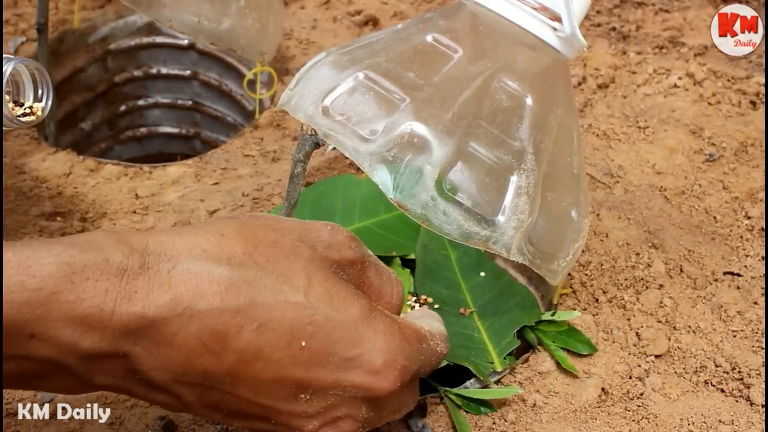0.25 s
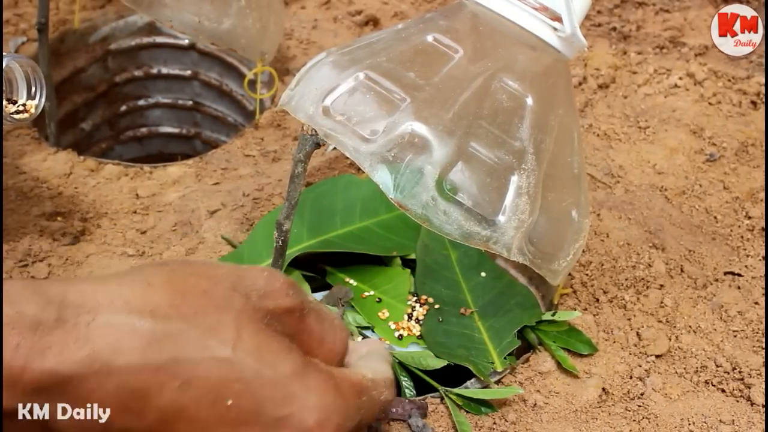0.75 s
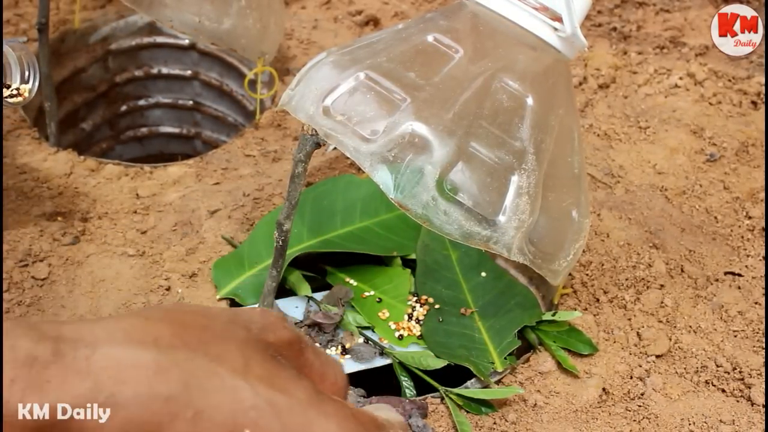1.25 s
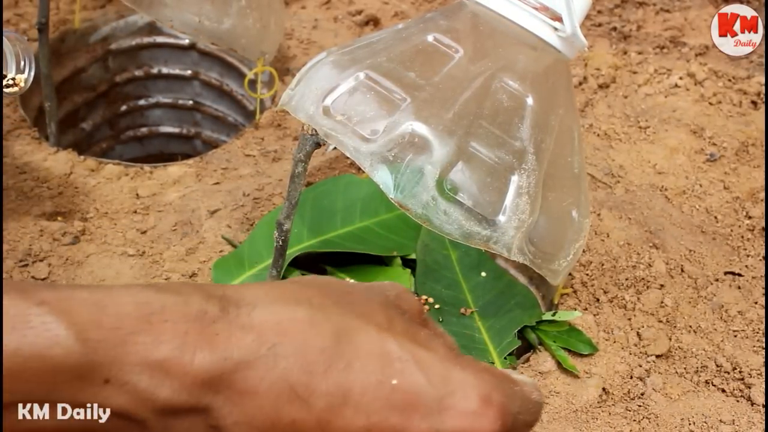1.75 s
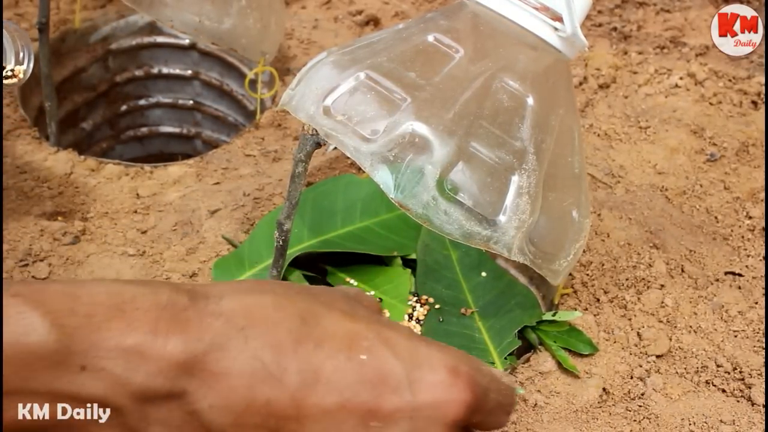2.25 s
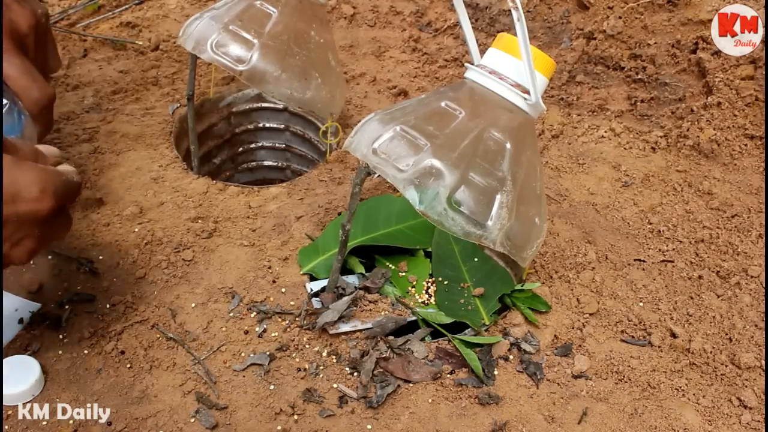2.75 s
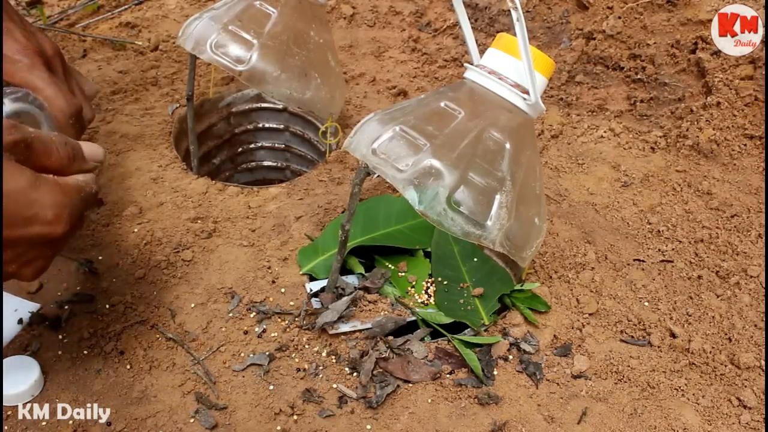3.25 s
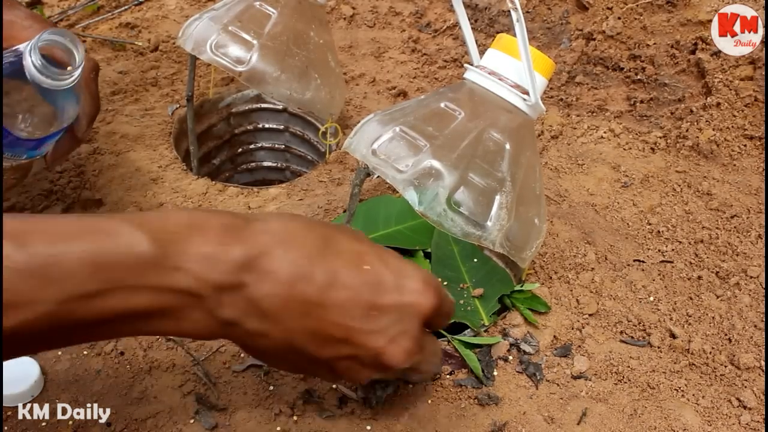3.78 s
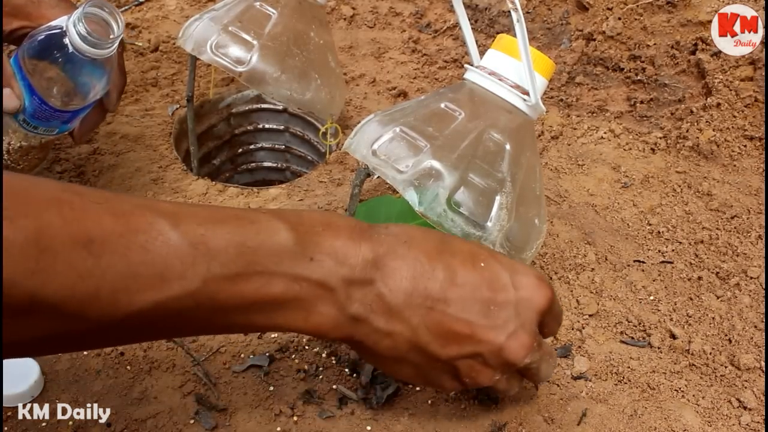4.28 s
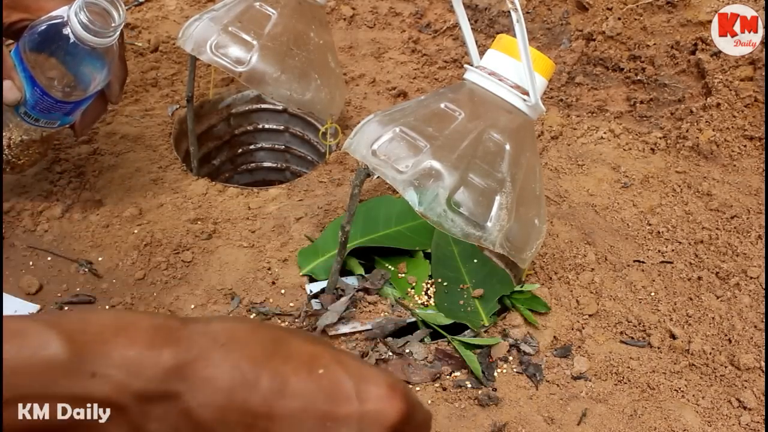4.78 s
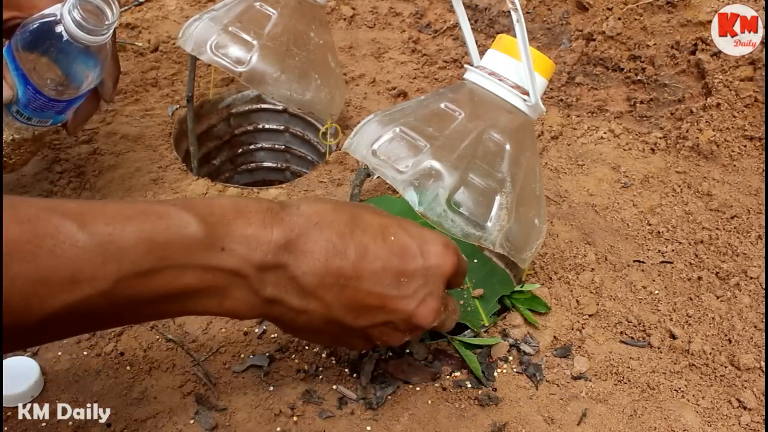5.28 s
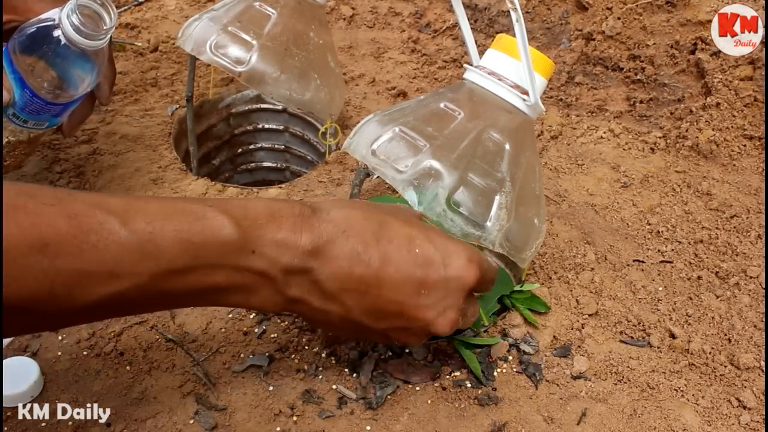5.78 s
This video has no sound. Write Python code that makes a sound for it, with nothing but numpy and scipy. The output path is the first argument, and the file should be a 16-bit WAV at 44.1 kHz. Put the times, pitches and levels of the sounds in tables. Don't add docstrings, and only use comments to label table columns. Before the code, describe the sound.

Close outdoor stereo pickup: fingers softly brush a leaf and a handful of seeds ticks down in dry crackles, over a low distant motor, a faint bird trill, insect buzz and far wooden thuds. A tiny dead silence cuts the motor off. Seeds then rattle through three shakes of a plastic bottle with sharp wall pops and a wind bump, followed by another sparse handful on leaves.

```python
import sys
import numpy as np
from scipy import signal
from scipy.fft import rfft, irfft, next_fast_len
from scipy.io import wavfile
from scipy.ndimage import uniform_filter1d

SR = 44100
rng = np.random.default_rng(int(sys.argv[2]) if len(sys.argv) > 2 else 0)


def elevation(decibels):
    levels = np.asarray(decibels, float)
    return 10 ** (levels / 20)


def dump(signal):
    limited = np.clip(np.atleast_2d(signal).T, -1, 1)
    pcm = np.round(limited * 32767).astype(np.int16)
    wavfile.write(sys.argv[1], SR, pcm)


N = 265702

# frequency in Hz, level in dB per Hz.
AIR_SPECTRUM = [(15, -37), (25, -21), (84, -2), (126, -4), (174, -4.5), (361, -9.5), (541, -10),
                (1350, -17), (2590, -17.5), (7820, -27), (14200, -36.5), (15800, -46)]
# frequency in Hz, side minus mid in dB.
AIR_WIDTH = [(60, -13.5), (110, -7), (200, 0.5), (380, 2), (700, 4.5), (1290, 3), (2380, 4), (4400, 0),
             (8120, 1.5), (15000, -2.5)]
# peak time in seconds, peak level in dB, length in seconds.
WIND_PUFFS = [(2.4, -57, .2), (2.64, -49.5, 0.2), (3.003, -54, 0.12), (3.46, -55, .05), (3.56, -40.5, .05),
              (3.655, -30, 0.047), (3.777, -36.5, 0.067), (3.894, -38, 0.053), (4.008, -37, 0.023),
              (4.175, -45, 0.088), (4.4, -52, 0.057), (4.9, -70, .3), (5.127, -56, .15), (5.396, -58, 0.11),
              (5.594, -49.5, .15), (5.914, -60, 0.13)]
# time in seconds, level in dB.
MOTOR_LEVEL = [(0, -53), (.24, -49.5), (.38, -53), (.69, -49), (.81, -58.5), (1.0, -57), (1.17, -53),
               (2.11, -49.5), (2.2, -54)]
# time in seconds, level in dB.
LEAF_BRUSH = [(0.0, -53), (0.072, -54.5), (0.118, -65), (0.132, -53.5), (0.156, -68), (0.206, -71),
              (0.25, -61)]
# time in seconds, peak in
# dB, centre in Hz, body in dB.
LEAF_TOUCHES = [(0.0518, -36, 2970, 3), (0.1313, -22.5, 3740, -34), (.177, -47, 1810, -9),
                (0.2093, -42, 2700, 9), (0.279, -45.5, 4250, -12), (.3353, -43, 3880, -14),
                (0.3652, -35, 5400, -1.5), (0.382, -35, 4400, -26), (.423, -40, 4200, -3),
                (0.4549, -22, 2480, -5), (0.4996, -32.5, 4160, -10), (.5337, -42, 10500, -18.5),
                (0.589, -40, 9600, -12), (.6388, -41.5, 8300, -9), (.6624, -41, 9000, -14),
                (0.6887, -35, 8500, -18), (0.72, -40.5, 7400, -5), (0.744, -42, 9000, 2),
                (0.7783, -39, 4200, -11), (.816, -31.5, 7560, -32), (.9084, -43, 4123, -6),
                (0.9785, -30, 2900, -36), (0.9933, -36, 5790, 2), (1.0405, -43, 2080, -10),
                (1.102, -31.5, 4170, -34), (1.149, -32.5, 3600, -39), (1.1865, -39, 2980, 1),
                (1.261, -33.5, 3560, -19), (1.5488, -46, 2750, -23),
                (3.8898, -39, 3830, -28), (3.9324, -48, 2150, 6.5), (3.9494, -55, 4580, -10),
                  (3.972, -35.5, 3060, -19), (4.2432, -43, 4490, 0), (4.329, -31.5, 2010, 3),
                  (4.3665, -41, 2150, -15), (4.3844, -51, 4520, 2), (4.401, -41, 4500, -24),
                  (4.422, -40.5, 4250, -27), (4.4664, -39, 4340, -17), (4.4997, -46, 2830, -12),
                  (4.517, -31.5, 4500, -4), (4.5255, -34, 4200, -11), (4.5357, -37, 4600, -8),
                  (4.5854, -45, 1914, -18), (5.1307, -37, 1760, 2), (5.1583, -39.5, 4000, 0),
                  (5.3333, -34, 3080, -31), (5.4023, -44, 2500, 2), (5.5879, -44, 7900, -20),
                  (5.647, -49, 2004, 5), (5.656, -40.5, 1150, -11), (5.798, -36.5, 5470, -4),
                  (5.8642, -41.5, 2090, 8), (5.884, -40, 5450, -3), (5.887, -43.5, 1050, -20),
                  (5.35, -47, 1800, -3)]
# time in seconds, peak in dB, centre in Hz, body in dB.
WALL_STRIKES = [(2.8832, -25, 2200, 5), (2.987, -45.5, 3810, -17), (3.02, -37.5, 3260, -8),
                (3.0954, -33.5, 2140, 3), (3.1538, -36, 3500, -24), (3.196, -36.5, 4280, -14),
                (3.2307, -37, 1670, 6.5), (3.276, -28, 4600, -9), (3.4, -23.5, 6180, 0),
                (3.4606, -25.5, 2150, -2), (3.612, -26, 4380, -12), (3.626, -29, 5090, -27)]
# time in seconds, peak in dB, decay time t60 in seconds.
FAR_BLOWS = [(0.181, -38.5, 0.5), (0.649, -41, 0.71), (2.03, -37, 0.34), (4.139, -44.5, 0.41),
             (5.229, -49, 0.38)]
# start in seconds, level in dB.
TRILL_NOTES = [(.285, -58), (.392, -57), (.515, -58), (.637, -57), (.758, -58), (.893, -57.5)]
# start in seconds, stop in seconds, start in Hz, end in Hz, level in dB.
FAR_HOOT = (1.13, 1.32, 640, 670, -66)
# start in seconds, stop in seconds, end level in dB.
INSECT_SWELLS = [
    (.4, .88, -65.5),
    (1.3, 1.91, -63),
]
# time in seconds, peak in dB.
LEAF_SAGS = [
    (.457, -44.5),
    (4.33, -42.5),
]
# start in seconds, stop in seconds.
PAUSE = (2.2045, 2.3025)
# time in seconds, level in dB.
BOTTLE_SHAKES = [
    [(2.3, -47.5), (2.306, -40), (2.318, -37.5), (2.408, -37.5), (2.46, -49), (2.542, -33.5), (2.67, -29.5),
     (2.698, -26.5), (2.784, -44.5)],
    [(2.786, -42.5), (2.836, -25.5), (2.874, -40), (2.886, -35.5), (2.894, -39), (3.086, -68.5),
     (3.096, -48), (3.112, -43.5), (3.186, -64)],
    [(3.188, -60), (3.292, -43), (3.344, -45), (3.43, -34.5), (3.504, -37.5), (3.606, -39.5), (3.63, -36),
     (3.652, -40), (3.76, -55)],
]
# frequency in Hz, level in dB per Hz.
SEED_SPECTRUM = [(180, -39), (300, -20), (759, -10.5), (881, -9), (2120, -3.5), (2550, -5), (3670, -0.5),
                 (8680, -4.5), (12700, -18.5), (15800, -35)]
# frequency in Hz, side minus mid in dB.
SEED_WIDTH = [(200, -6), (700, -12), (2400, -10), (8000, -7), (15000, -5)]
# frequency in Hz, width in Hz, boost in dB.
WALL_RESONANCES = [(2197, 57, 4), (3070, 220, 4), (3680, 1070, 3), (4600, 350, 3), (5450, 260, 4),
                   (6100, 660, 3.5)]
# time in seconds, mode in Hz,
# level against the slide in dB, half length in seconds.
CROWD_RINGS = [(3.45, 2150, -7, .03), (2.47, 2000, -7, .04), (2.705, 3750, -7, .035),
               (2.835, 3800, -6, .03), (3.63, 5100, -4, .02), (3.44, 6100, -8, .05)]
# time in seconds, peak in dB, then cavity, wall and rim mode levels in dB.
WALL_POPS = [
    (2.409, -40, -7, 4.5, 11),
    (2.496, -39.5, 2.5, -9, -2),
    (2.882, -18.5, -13, -10.5, -10),
    (3.0971, -25, -12, 0, 12),
    (3.229, -19, -9.5, -5, -20),
]
# frequency in Hz, decay time t60 in seconds.
POP_RING = [(225, 0.082), (520, 0.03), (820, 0.0091), (1300, 0.012), (2000, 0.0093)]
# start in seconds, length in seconds, start in Hz, end in Hz, level in dB.
WARBLE_NOTES = [(4.718, .016, 3400, 3200, -64), (4.745, .025, 3350, 3500, -66),
                (4.787, .022, 3150, 3250, -59), (4.815, .022, 2900, 2500, -64),
                (4.87, .03, 2300, 2200, -66), (5.235, .025, 2800, 2500, -66), (5.43, .025, 3400, 2500, -66),
                (5.505, .025, 3500, 3850, -65), (5.705, .045, 3150, 2450, -65)]

PORT_LAG_S = .000024
SEED_MEAN_DB, BOTTLE_PAN_DB = -41, 2.5


def in_time(rows, outside=None):
    s, *columns = np.transpose(rows)
    return [np.interp(np.arange(N) / SR, s, c, outside, outside) for c in columns]


def at_hz(points, hz):
    point_hz, point_db = np.array(points).T
    return np.interp(np.log(hz), np.log(point_hz + 1), point_db)


def rms_one(x):
    return x / np.sqrt(np.mean(x ** 2) + 1e-20)


def drift(rate):
    r = np.exp(-80 * np.pi * rate / SR)
    slow = signal.lfilter([1], [1, -2 * r, r * r], rng.standard_normal(N // 40 + 2002))[2000:]
    return np.interp(np.arange(N) / 40, np.arange(len(slow)), rms_one(slow))


def resonance(x, hz, width_hz):
    r = np.exp(-np.pi * width_hz / SR)
    poles = [1, -2 * r * np.cos(2 * np.pi * hz / SR), r * r]
    return signal.lfilter([(1 - r * r) / 2, 0, (r * r - 1) / 2], poles, x)


def band(x, low_hz, high_hz):
    return signal.sosfilt(signal.butter(2, [low_hz, min(high_hz, .45 * SR)], "band", fs=SR, output="sos"), x)


def pan(db):
    return elevation(np.array([db / 2, -db / 2]))


def lagged(x):
    size = next_fast_len(N)
    turn = np.exp(-2j * np.pi * np.fft.rfftfreq(size, 1 / SR) * PORT_LAG_S)
    right = irfft(rfft(x[1], size) * turn, size)[:N]
    return np.array([x[0], right])


def banks(white, spectrum, side_db, low_hz, patchy_db, tilt_db=0):
    out, edges = 0, 20 * 2 ** np.arange(0, 10.1, .5)
    for k, (low, high) in enumerate(zip(edges, edges[1:])):
        if low >= low_hz:
            mid, side = band(white[k % 2], low, high)
            hz = np.sqrt(low * high)
            lift = tilt_db * np.clip(np.log2(hz / 4500), 0, 1)
            share = elevation(at_hz(side_db, hz))
            gain = elevation(at_hz(spectrum, hz) + lift + patchy_db * drift(18)) / np.sqrt(1 + share ** 2)
            out = out + gain * (mid + share * side * [[1], [-1]])
    return out


def open_air():
    air = banks(rng.standard_normal((2, 2, N)), AIR_SPECTRUM, AIR_WIDTH, 20, patchy_db=1.55)
    loudness = np.sqrt(np.mean(band(air.mean(axis=0), 208, 12000) ** 2))
    fade_db = 0.38 * np.arange(N) / SR
    return air / loudness * elevation(-56.24 - fade_db)


def wind():
    eddies = band(band(rng.standard_normal((2, N)), 21, 120), 19, 126)
    mid, side = eddies / np.sqrt(uniform_filter1d(eddies ** 2, 2600) + 1e-6)
    t = np.arange(N) / SR
    calm_db, drop_db = -67.5, 21
    gust = elevation(calm_db) + sum(elevation(db - drop_db * ((t - s) / length) ** 2) for s, db, length in WIND_PUFFS)
    return gust * elevation(-2.5 + .8 * drift(13)) * (.45 * mid + side * np.array([[.8], [-1.2]]))


def motor():
    db, = in_time(MOTOR_LEVEL)
    phase = 2 * np.pi * 113.8 * np.arange(N) / SR + 0.42 * drift(5.3)
    lead = .9
    level = np.sqrt(2) * elevation(db + 1.0 + 0.6 * drift(22))
    return level * np.sin(phase + np.array([[lead / 2], [-lead / 2]]))


def leaf_brush():
    rub = rng.standard_normal((2, N)) + 0.49 * rng.standard_normal(N)
    return rms_one(resonance(rub, 2050, 700)) * elevation(in_time(LEAF_BRUSH, outside=-120)[0] - 3.0)


def seed_ticks():
    out, t = np.zeros((2, N + 2000)), np.arange(2000) / SR
    touches = [row + (0,) for row in LEAF_TOUCHES]
    touches += [row + (BOTTLE_PAN_DB,) for row in WALL_STRIKES]
    for s, db, hz, low_db, side_db in touches:
        grit = rng.standard_normal(2000) * elevation(2.2 * rng.standard_normal(2000))
        burst = grit * (np.exp(-t / 0.0042) + 0.33 * np.exp(-t / 0.0087))
        low_hz = max(min(2200, .8 * hz), .5 * hz)
        voice = band(burst, low_hz, max(10000, 1.4 * hz))
        voice = voice + 1.2 * resonance(resonance(burst, hz, .3 * hz), hz, .4 * hz)
        voice = voice / abs(voice).max()
        body = band(band(burst, 1500, 3300), 1100, 3800)
        edge = band(band(burst, 7500, 13000), 7000, 14000)
        edge_db = -17.5 - .7 * (db - SEED_MEAN_DB) + 4 * np.log2(hz / 4000)
        voice += elevation(low_db - 4.5) * body / abs(body).max()
        voice += elevation(edge_db) * edge / abs(edge).max()
        i = round((s + 0.00044) * SR)
        out[:, i:i + 2000] += elevation(db - 3.0) * np.outer(pan(side_db), voice)
    return lagged(out[:, :N])


def thuds():
    out, t = np.zeros((2, N)), np.arange(20000) / SR
    for s, db, t60 in FAR_BLOWS:
        echo = rng.standard_normal((2, 20000)) + .8 * rng.standard_normal(20000)
        echo = echo * (1 + 0.22 * np.cos(2 * np.pi * 32 * t) + 0.61 * np.exp(-t / 0.0014))
        body = resonance(resonance(echo, 555, 180), 520, 280) + 0.21 * resonance(echo, 980, 270)
        i = round((s - .001) * SR)
        out[:, i:i + 20000] += elevation(db - 8.5 - 60 * t / max(t60, .05)) * rms_one(body)
    return out


def bird():
    out, t = np.zeros(N), np.arange(round(.062 * SR)) / SR
    for s, db in TRILL_NOTES:
        hz = 4340 - 2400 * t - 22000 * t ** 2 + 25 * rng.standard_normal()
        swell = np.sin(np.pi * (t / t[-1]) ** 0.636)
        i = round(s * SR)
        out[i:i + len(t)] += elevation(db) * swell * np.sin(2 * np.pi * np.cumsum(hz) / SR)
    out = out * elevation(1.2 * drift(70))
    start, stop, start_hz, stop_hz, db = FAR_HOOT
    hz, swell = in_time([(start, start_hz, 0), (start + 0.079, start_hz, 1),
                         (stop - .04, stop_hz, 1), (stop, stop_hz, 0)])
    out = out + elevation(db + 2.0 * drift(33)) * swell * np.sin(2 * np.pi * np.cumsum(hz) / SR)
    echoes = [np.roll(out, round(lag * SR)) for lag in (.011, .017)]
    return out + .25 * np.array(echoes)


def insect():
    clicks = (rng.random((2, N)) < 1500 / SR) * rng.standard_normal((2, N))
    buzz = rms_one(resonance(resonance(clicks, 7560, 350), 7500, 500)) * elevation(drift(30))
    swells = [[(start, db - 13), ((start + stop) / 2, db - 3), (stop, db), (stop + .02, db - 20)]
              for start, stop, db in INSECT_SWELLS]
    return buzz * sum(elevation(in_time(rows, outside=-120)[0]) for rows in swells)


def leaf_sags():
    out, t = np.zeros(N), np.arange(4000) / SR
    hollow_hz, t60_s = 253, 0.061
    for s, db in LEAF_SAGS:
        i = round(s * SR)
        out[i:i + 4000] += elevation(db - 60 * t / t60_s) * np.sin(2 * np.pi * hollow_hz * t)
    return out


def bottle_seeds():
    pour = sum(BOTTLE_SHAKES, [])
    last_s, last_db = pour[-1]
    pour = pour + [(last_s + .3, last_db - 14)]
    level_db, = in_time(pour)
    effort_db = level_db - SEED_MEAN_DB

    hits = rng.random((2, 1, N)) < 5000 * elevation(2 * drift(120)) / SR
    sizes = elevation(3.5 * np.minimum(rng.exponential(1, (2, 1, N)), 4))
    strikes = signal.lfilter([1], [1, -.7], hits * sizes)
    rattle = (rms_one(strikes) + .7) * rng.standard_normal((2, 2, N))

    sound = banks(rattle, SEED_SPECTRUM, SEED_WIDTH, 200, patchy_db=1.5, tilt_db=0.1642 * effort_db)
    wall = sum((elevation(db) - 1) * resonance(sound, hz, width) for hz, width, db in WALL_RESONANCES)
    sound = rms_one(sound + wall)
    t = np.arange(N) / SR
    crowded = sum(elevation(db - 8.2 * ((t - s) / half) ** 2) * rms_one(resonance(sound, hz, 250))
                  for s, hz, db, half in CROWD_RINGS)
    neck = elevation(np.minimum(-4.5 - 0.3 * effort_db, -4))
    sound = sound + crowded + neck * elevation(-10.5) * rms_one(resonance(sound, 1990, 450))

    sounding = in_time([(pour[0][0], 1), (pour[-1][0], 1)], outside=0)[0]
    return lagged(sound * elevation(level_db + 0.5) * pan(BOTTLE_PAN_DB)[:, None] * sounding)


def wall_pops():
    out, t = np.zeros(N), np.arange(4000) / SR
    for s, db, cavity_db, wall_db, rim_db in WALL_POPS:
        dent_db, shoulder_db = 2, 0.5 + 0.34 * rim_db
        modes_db = cavity_db, wall_db, dent_db, shoulder_db, rim_db
        ring = sum((-1) ** k * elevation(m - 60 * t / t60) * np.sin(2 * np.pi * hz * t)
                   for k, (m, (hz, t60)) in enumerate(zip(modes_db, POP_RING)))
        i = round((s + .0003) * SR)
        out[i:i + 4000] += elevation(db - 1.5) * ring * (1 - np.exp(-t / 0.00061))
    return lagged(out * pan(1.82)[:, None])


def songbird():
    out = np.zeros(N)
    for s, length, start_hz, end_hz, db in WARBLE_NOTES:
        hz = np.linspace(start_hz, end_hz, round(length * SR))
        swell = np.hanning(len(hz)) ** .5
        i = round(s * SR)
        out[i:i + len(hz)] += elevation(db + 1) * swell * np.sin(2 * np.pi * np.cumsum(hz) / SR)
    return out


def scene():
    first_part = np.arange(N) < np.mean(PAUSE) * SR
    background = open_air() + wind() + motor() * first_part
    leaves = leaf_brush() + seed_ticks() + leaf_sags()
    far = thuds() + bird() + insect() + songbird()
    bottle = bottle_seeds() + wall_pops()
    return background + leaves + far + bottle


def low_pass(x):
    return signal.sosfilt(signal.butter(12, 15920, fs=SR, output="sos"), x)


def record(dry):
    stop, start = PAUSE
    gate = in_time([(stop - .0006, 1), (stop, 0), (start, 0), (start + 0.00089, 1)])[0]
    heard = signal.sosfilt(signal.butter(2, 14500, fs=SR, output="sos"), dry)
    return low_pass(heard * gate)


dry = scene()
out = record(dry)
dump(out)
```